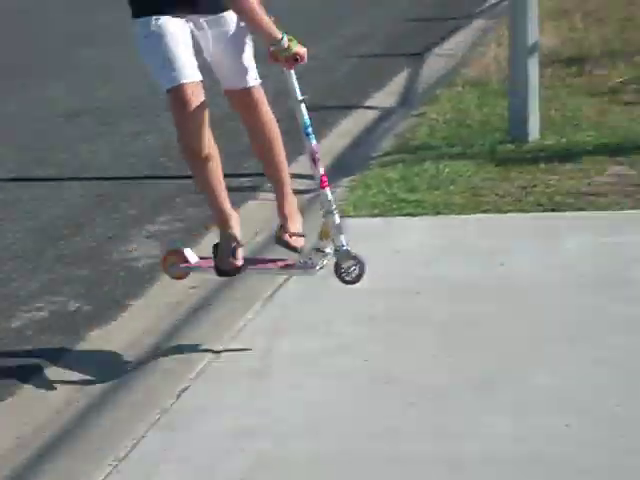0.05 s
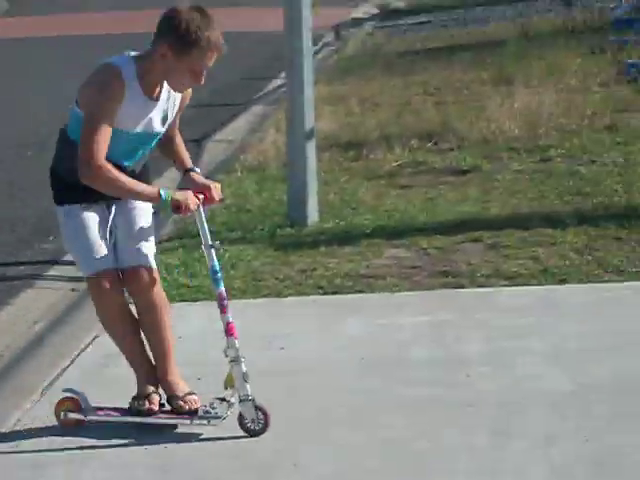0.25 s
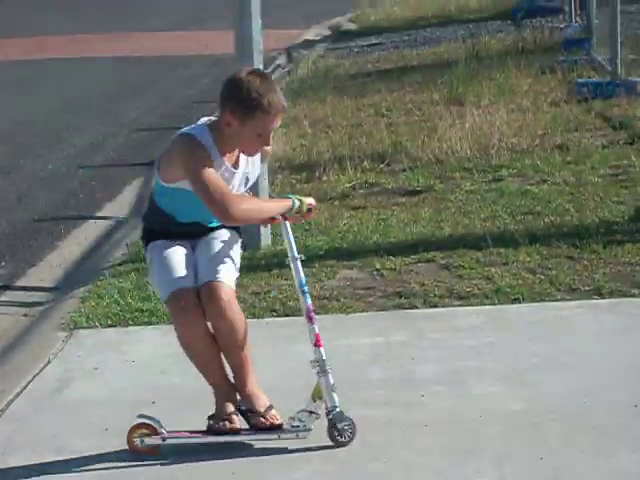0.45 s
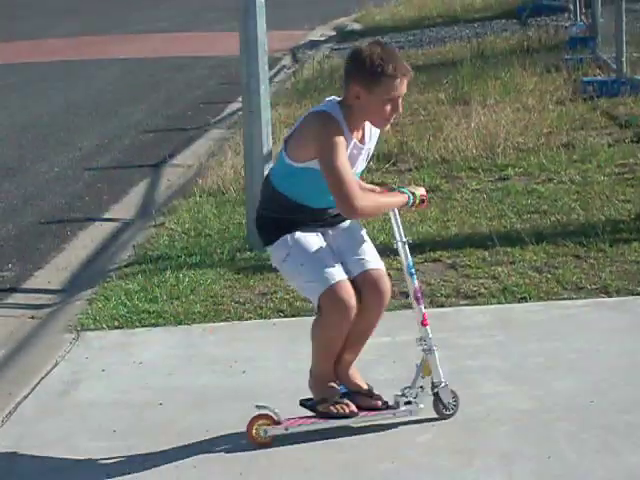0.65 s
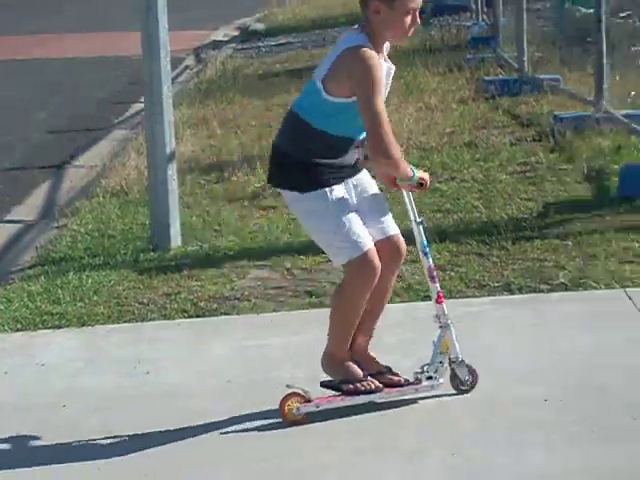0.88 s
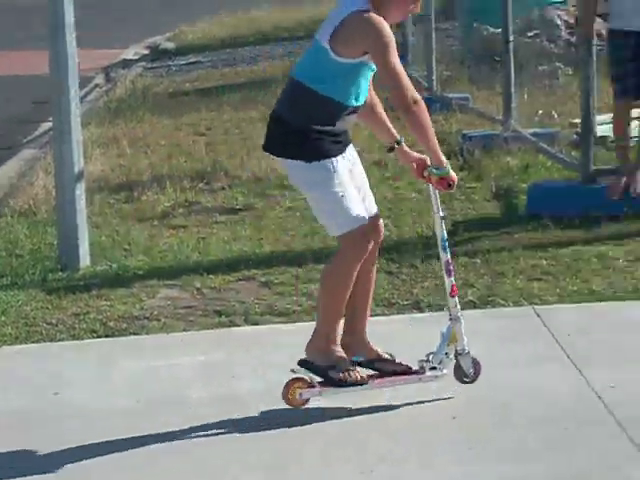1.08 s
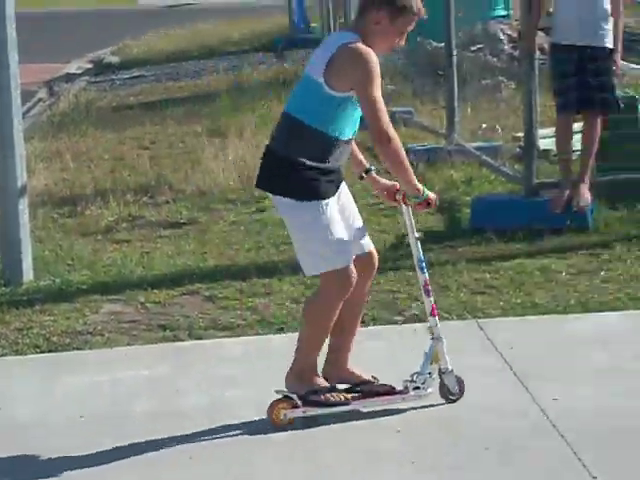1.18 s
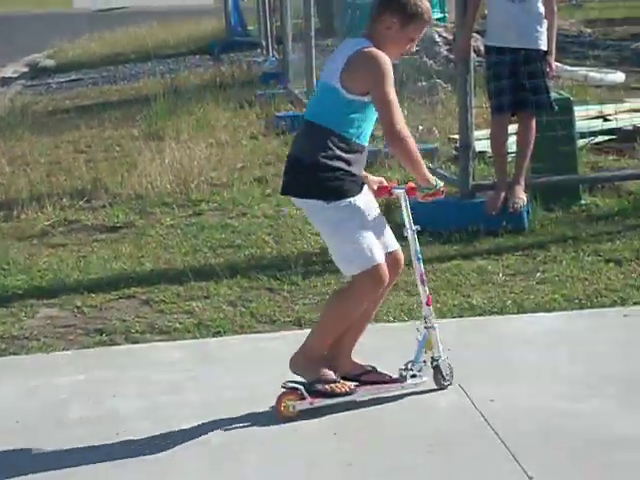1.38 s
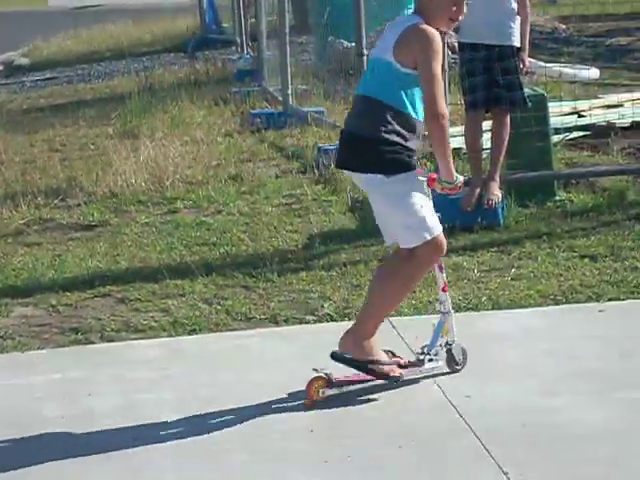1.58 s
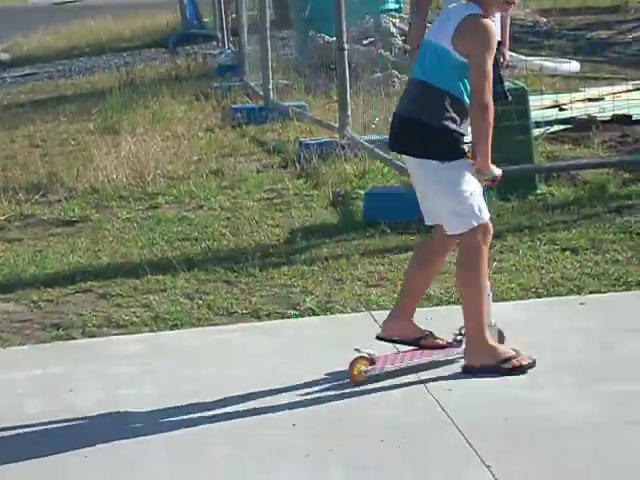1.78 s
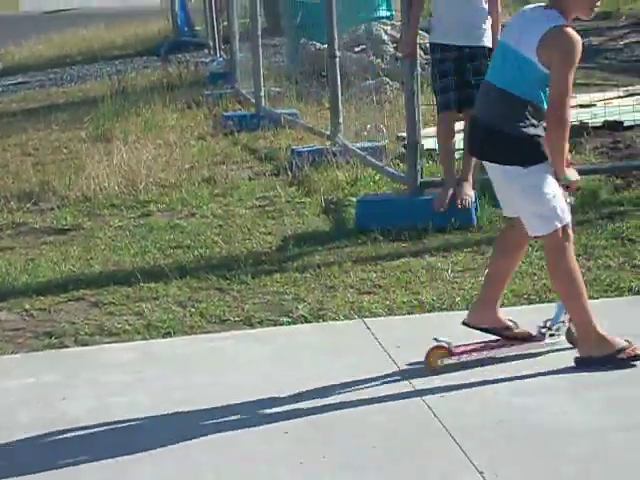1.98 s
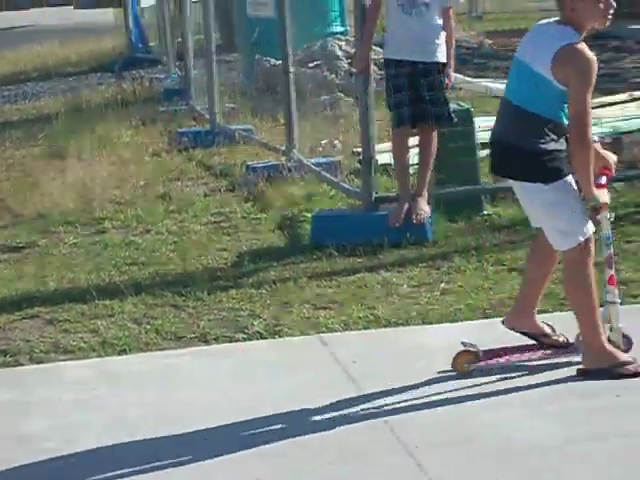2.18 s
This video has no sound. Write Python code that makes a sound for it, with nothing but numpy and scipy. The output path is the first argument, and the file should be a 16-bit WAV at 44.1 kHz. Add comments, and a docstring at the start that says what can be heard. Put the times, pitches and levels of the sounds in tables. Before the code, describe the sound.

A kick scooter slams onto concrete, rattles, hops once and rolls on.

```python
"""Kick scooter jumping a kerb

A scooter rattles in the air, slams onto a concrete path, hops once more and rolls on, its hard wheels
ticking over grit. Each blow excites the modes of its loose metal frame, and houses return faint echoes.
Distant traffic and light wind lie beneath, and two thin whines come in near the end.
The small camera that picks it all up has little treble and overloads on the big slam."""
import sys
import numpy as np
from scipy import signal
from scipy.fft import rfft, irfft
from scipy.io import wavfile

SR = 44100
rng = np.random.default_rng(int(sys.argv[2]) if len(sys.argv) > 2 else 0)


def transcribe(u):
    """Save the signal u as a 16-bit wav file named by the first command-line argument.

    u: samples, shape (n,) or (channels, n), limited to [-1, 1]; the rate is SR.
    q: integer samples, one column per channel.
    """
    v = np.clip(np.atleast_2d(u).T, -1, 1)
    q = np.round(v * 32767).astype(np.int16)
    wavfile.write(sys.argv[1], SR, q)


N = 99225
HZ, TIME = np.fft.rfftfreq(N, 1 / SR), np.arange(N) / SR
RING_TIME = TIME[:SR // 5]
TOP_HZ, ATTACK_S = 6400, 0.00045
ONSET = 1 - np.exp(-RING_TIME / ATTACK_S)


def amp(db):
    """Amplitude grows tenfold for every 20 dB."""
    return 10 ** (np.asarray(db) / 20)

def unit(x):
    """Normalisation to an rms of 1."""
    return x / np.sqrt(np.mean(x ** 2) + 1e-20)

def curve_at(points, hz):
    """Interpolation on a logarithmic frequency axis."""
    f, value = np.transpose(points)
    return np.interp(np.log(hz + 1), np.log(f), value)

def envelope(points):
    """Gain over time, interpolated in decibels."""
    return amp(np.interp(TIME, *np.transpose(points)))

def add(mix, start_s, sound):
    """Superposition: a sound sums into the mix from its starting time."""
    part = mix[max(round(start_s * SR), 0):][:len(sound)]
    part += sound[:len(part)]

def shape(x, gain):
    """Zero-phase filtering by multiplication of the spectrum."""
    return irfft(rfft(x) * gain, len(x))

def band(x, edges_hz):
    """Causal Butterworth band-pass filtering."""
    return signal.sosfilt(signal.butter(2, edges_hz, "band", fs=SR, output="sos"), x)

def noise(gain):
    """White noise takes on the spectrum of its filter; the rms is 1."""
    return unit(shape(rng.standard_normal(N), gain * (HZ < TOP_HZ)))

def narrow_noise(hz, width_hz):
    """Noise confined to a narrow band is heard as a wavering tone."""
    return noise(1 / (1 + (2 * (HZ - hz) / width_hz) ** 2))

def decay(t60):
    """Exponential damping: a fall of 60 dB in t60 seconds."""
    return np.exp(-np.log(1000) * RING_TIME / t60)


# spectrum of distant traffic: f/Hz, relative level/dB
TRAFFIC_SPECTRUM = [(20, 0), (60, -6), (110, 0), (200, -4), (400, -10), (800, -13.5), (1300, -16.5),
                    (2100, -19), (3500, -21.5), (5200, -27)]

def traffic():
    """Many distant sources sum to steady broadband noise, here with a low drone."""
    rumble = amp(-43) * noise(amp(curve_at(TRAFFIC_SPECTRUM, HZ)))
    drone = amp(-48.5) * narrow_noise(hz=74.6, width_hz=9)
    return rumble + drone


# spectrum of wind on the microphone: f/Hz, relative level/dB
WIND_SPECTRUM = [(8, -3.5), (30, -2.5), (60, -3.5), (120, -15.5), (300, -34.5), (1000, -58.5)]
# strength of the gusts: t/s, level/dB
WIND_GUSTS = [(0, -40.5), (.12, -53.5), (.22, -29.5), (.36, -56), (.55, -49), (.68, -36), (.85, -53),
              (1.5, -53), (1.88, -51.5), (2.1, -44), (2.23, -34)]

def wind():
    """Turbulence at the microphone gives low-frequency pressure noise that swells with each gust."""
    return envelope(WIND_GUSTS) * noise(amp(curve_at(WIND_SPECTRUM, HZ)))


# spectrum of wheels on concrete: f/Hz, relative level/dB
ROLLING_SPECTRUM = [(100, -3.5), (300, 0.5), (900, 0.5), (2100, -8.5), (2700, -1.5), (3400, -5), (4200, -3),
                    (5500, -3)]
# strength of the rolling noise: t/s, level/dB
ROLLING_LEVEL = [(.25, -48), (.3, -40), (.55, -51), (.95, -52.5), (1.12, -49.5), (1.3, -51), (1.6, -53.5),
                 (1.9, -50), (2.25, -49.5)]

def wheels(grains_per_s=2500, spread_db=2.5):
    """Roughness excitation: hard wheels meet grit in a random train of small impulses."""
    sizes = amp(spread_db * np.minimum(rng.exponential(1, N), 4))
    signs = rng.choice([-1, 1], N)
    struck = rng.random(N) < grains_per_s / SR
    response = amp(curve_at(ROLLING_SPECTRUM, HZ)) * (HZ < TOP_HZ)
    return envelope(ROLLING_LEVEL) * unit(shape(sizes * signs * struck, response))


# modes of the metal frame: f/Hz, relative level/dB, T60/s
FRAME_MODES = [(801, -12.5, .07), (920, -12, 0.17), (1430, -10, 0.064), (1580, -13, 0.03),
               (1910, -10, 0.099), (2432, -6, 0.092), (2615, 1.5, 0.081), (2672, 2, 0.065),
               (2959, -5.5, .08), (3092.7, -6, 0.14), (3400, -13.5, 0.11), (3625, -10, 0.18),
               (3940, -18.5, 0.023), (4810, -7.5, 0.14)]

def impact(spectrum, t60, ring_db, low_db=0, high_db=0):
    """Impact excitation: a contact tick and a dense, brief crack, then free decay of the frame's modes."""
    def tilt(hz):
        low_shelf = 1 / (1 + (hz / 2150) ** 6)
        high_shelf = 1 - 1 / (1 + (hz / 3900) ** 12)
        return amp(low_db * low_shelf + high_db * high_shelf)
    f = np.fft.rfftfreq(len(RING_TIME), 1 / SR)
    colour = amp(curve_at(spectrum, f)) * tilt(f) * (f < TOP_HZ)
    crack = unit(shape(rng.standard_normal(len(RING_TIME)), colour))
    contact = amp(-7) * decay(t60=0.0056)  # the hard tick as two parts meet
    mode_hz, mode_db, mode_t60 = np.transpose(FRAME_MODES)
    scatter_db = 3 * rng.standard_normal(len(mode_hz))  # each blow excites the modes differently
    strengths = tilt(mode_hz) * amp(mode_db + ring_db + scatter_db)
    cycles = mode_hz[:, None] * RING_TIME + rng.random((len(mode_hz), 1))
    ring = strengths @ (decay(mode_t60[:, None]) * np.sin(2 * np.pi * cycles))
    return (crack * (decay(t60) + contact) + ring) * ONSET


# knocks of loose parts: t/s, level/dB, T60/s, low-shelf gain/dB, high-shelf gain/dB
FRAME_KNOCKS = [(0.0476, -36, 0.082, 1, -1), (0.0647, -22.5, 0.019, -10, -2), (0.0771, -28, 0.01525, 3, -4),
                (0.14, -27.5, .035, -1, 2), (0.145, -27.5, 0.037, -1, 0), (0.17, -32.5, 0.0178, -5.5, 0),
                (0.179, -33.5, 0.0639, -20, 0), (0.1884, -28.5, 0.033, -10, 8),
                (0.2405, -26.5, 0.023, -7, 0.5), (1.0001, -33, .06, 6, -8.5), (1.016, -21, .03, 7.5, -3.5),
                (1.021, -26.5, 0.037, 8.5, 3), (1.0317, -21.5, .035, -2.5, 3), (1.0425, -15.5, 0.027, 3, 2),
                (1.0459, -16, 0.019, -8, -3.5), (1.0587, -26.5, 0.048, -4, 0.5),
                (1.0723, -20.5, 0.027, -4.5, -1), (1.123, -38.5, 0.02785, -4, -3),
                (1.821, -40, 0.0452, 6, 1), (1.87, -44.5, 0.0566, 1.5, 0)]
# spectrum of a knock's crack: f/Hz, relative level/dB
KNOCK_SPECTRUM = [(150, -23.5), (620, -31), (830, -4), (1080, -12.5), (1450, -15), (1830, -0.5),
                  (2170, -14), (2720, 5.5), (3200, 0), (3480, 2), (3900, -4.5), (4600, -4), (5500, -10)]

def rattle():
    """Loose parts collide across their clearances, and each collision rings the frame."""
    out = np.zeros(N)
    for start_s, db, t60, low_db, high_db in FRAME_KNOCKS:
        knock = impact(KNOCK_SPECTRUM, t60, ring_db=-16, low_db=low_db, high_db=high_db)
        add(out, start_s, amp(db) * knock)
    return out


# wheels and deck striking after the jump: t/s, level/dB, T60/s
JUMP_IMPACTS = [(.248, -5, 0.036), (0.2524, 0.5, 0.032), (0.2573, 1.5, 0.038), (0.2644, -3.5, .033),
                (0.2687, -3, 0.021), (0.286, -21.5, 0.087), (0.293, -20.5, .05), (0.302, -26.5, .04)]
# spectrum of their crack: f/Hz, relative level/dB
JUMP_SPECTRUM = [(80, -17), (170, -12.5), (270, -4), (500, -11), (850, -7), (1150, -7), (1400, -2.5),
                 (1650, -9), (2100, -3), (2500, 2.5), (2850, -4), (3800, -1), (4600, -5.5), (5500, -4)]

def jump_landing():
    """Temporal integration: impacts of wheels and deck, milliseconds apart, are heard as one slam."""
    out = np.zeros(N)
    for start_s, db, t60 in JUMP_IMPACTS:
        add(out, start_s, amp(db) * impact(JUMP_SPECTRUM, t60, ring_db=-19))
    return out


# the rider's weight reaching the ground: t/s, level/dB, centre f/Hz
RIDER_THUMPS = [(.248, -22, 230), (.29, -26.5, 209), (1.2, -22.5, 142)]

def rider_thumps(edge_ratio=1.49, t60=0.065):
    """Momentum transfer: the rider's mass meets the ground in a low, heavily damped band of noise."""
    out = np.zeros(N)
    for start_s, db, hz in RIDER_THUMPS:
        body = unit(band(rng.standard_normal(len(RING_TIME)), (hz / edge_ratio, hz * edge_ratio)))
        add(out, start_s, amp(db) * body * decay(t60) * ONSET)
    return out


# wheels striking after the hop, with one rebound: t/s, level/dB, T60/s
HOP_IMPACTS = [(1.2032, -10.5, 0.047), (1.2095, -6, 0.027), (1.2143, -11, 0.039), (1.2199, -11, 0.035),
               (1.2423, -14, 0.02)]
# spectrum of their crack: f/Hz, relative level/dB
HOP_SPECTRUM = [(200, -23), (550, -35), (880, -4.5), (1330, -12.5), (1620, -1), (2150, -8.5), (2700, 3.5),
                (3250, 2.5), (3700, -4), (4300, 0), (4800, -4), (5500, -8.5)]

def hop_landing():
    """A smaller fall carries less kinetic energy, so the same modes ring more softly."""
    out = np.zeros(N)
    for start_s, db, t60 in HOP_IMPACTS:
        add(out, start_s, amp(db) * impact(HOP_SPECTRUM, t60, ring_db=-20.5))
    return out


# thin whines: start t/s, end t/s, f/Hz, bandwidth/Hz, level/dB
WHINE_BANDS = [(1.42, 1.95, 3136, 25, -65), (1.936, 2.234, 5080, 160, -56.5)]

def whines(flutter_db=2, fade_s=0.036):
    """Random amplitude modulation makes two faint, high bands of noise flutter."""
    flutter = unit(amp(flutter_db * np.tanh(narrow_noise(hz=15, width_hz=15))))
    out = np.zeros(N)
    for start_s, end_s, hz, width_hz, db in WHINE_BANDS:
        fade = np.clip(np.minimum(TIME - start_s, end_s - TIME) / fade_s, 0, 1)
        out += amp(db) * flutter * narrow_noise(hz, width_hz) * fade
    return out


# decay of sound scattered by ground, fence and houses: f/Hz, T60/s
SCATTER_T60 = [(200, 1.06), (600, .5), (1500, 0.49), (3000, 0.7149), (5500, 0.24)]
# spectrum of the scattered sound: f/Hz, relative level/dB
SCATTER_SPECTRUM = [(200, 2), (700, -1), (1500, 1), (3000, -7), (5000, 0.5)]
# echoes from house fronts: delay t/s, level before the band-pass/dB
HOUSE_ECHOES = [(.141, -30), (.319, -39)]

def reflections(x, tail_db=-19.5, near_db=-18):
    """Convolution with an outdoor impulse response: near reflections, a diffuse tail and two echoes."""
    def burst(t60):
        scatter = rng.standard_normal(len(RING_TIME)) * decay(t60)
        return scatter / np.linalg.norm(scatter)
    hz, t, bands = signal.stft(rng.standard_normal(SR), SR, nperseg=256)
    fall = np.exp(-np.log(1000) * t / curve_at(SCATTER_T60, hz)[:, None])
    colour = amp(curve_at(SCATTER_SPECTRUM, hz))[:, None]
    _, tail = signal.istft(bands * fall * colour, SR, nperseg=256)
    response = amp(tail_db) * tail / np.linalg.norm(tail)
    add(response, 0.004, amp(near_db) * burst(t60=0.13276))
    for delay_s, db in HOUSE_ECHOES:
        add(response, delay_s, amp(db) * band(burst(t60=0.029), edges_hz=(2400, 3510)))
    return signal.fftconvolve(x, response)[:N]


def scene():
    """Linear superposition of background, rolling noise, blows and their reflections, in mono."""
    blows = rattle() + jump_landing() + rider_thumps() + hop_landing()
    return (traffic() + wind() + wheels() + blows + reflections(blows) + whines())[None]


# treble response of the camera: f/Hz, gain/dB
CAMERA_RESPONSE = [(4900, 1), (5250, -1), (5500, -11), (6000, -16.5), (6400, -54.5), (6900, -82.5),
                   (8000, -100)]
# softening of the treble after the overload: f/Hz, gain/dB
OVERLOAD_SOFTENING = [(5500, 0), (7000, -6), (11000, -9.5), (16000, -8.5)]

def record(dry, clip_level=0.71, cutoff_hz=16500):
    """Nonlinear distortion: the camera cuts the treble, clips peaks, then softens the added overtones."""
    dulled = shape(dry[0], amp(curve_at(CAMERA_RESPONSE, HZ)))
    clipped = np.clip(dulled, -clip_level, clip_level)
    softened = shape(clipped, amp(curve_at(OVERLOAD_SOFTENING, HZ)))
    band_limit = 1 / (1 + (HZ / cutoff_hz) ** 240)
    return shape(softened, band_limit)[None]


dry = scene()
out = record(dry)
transcribe(out)
```